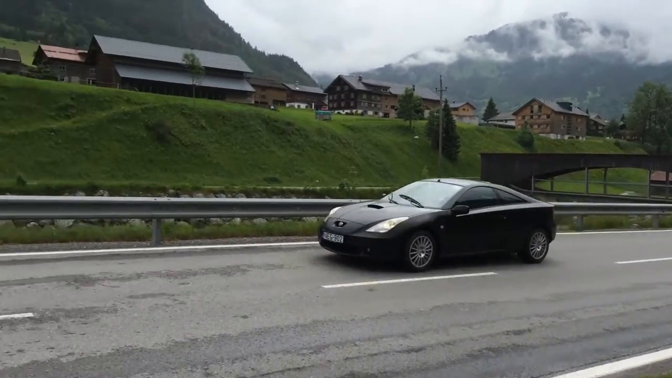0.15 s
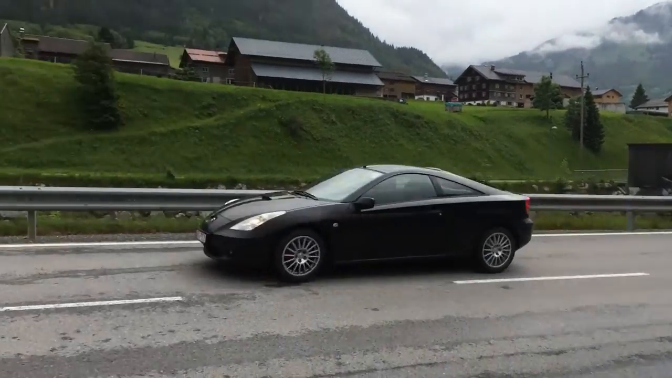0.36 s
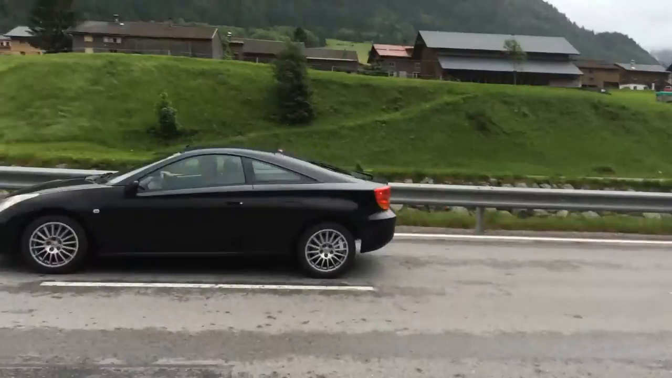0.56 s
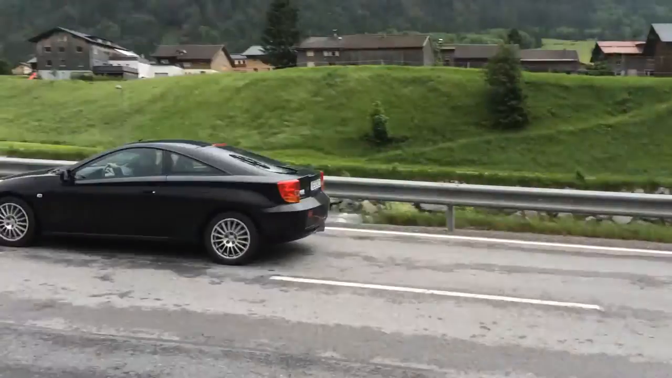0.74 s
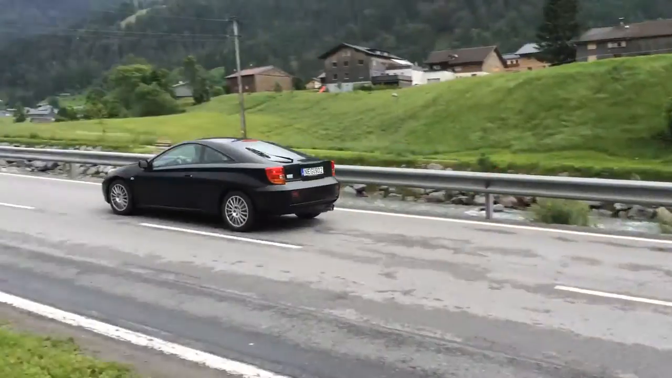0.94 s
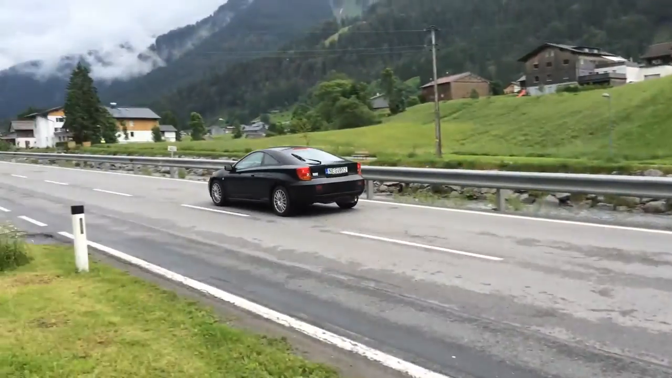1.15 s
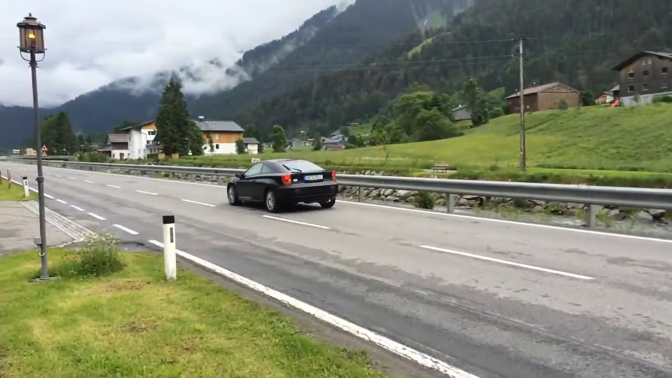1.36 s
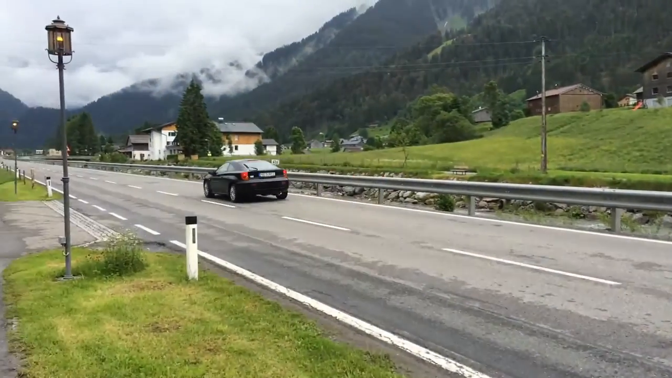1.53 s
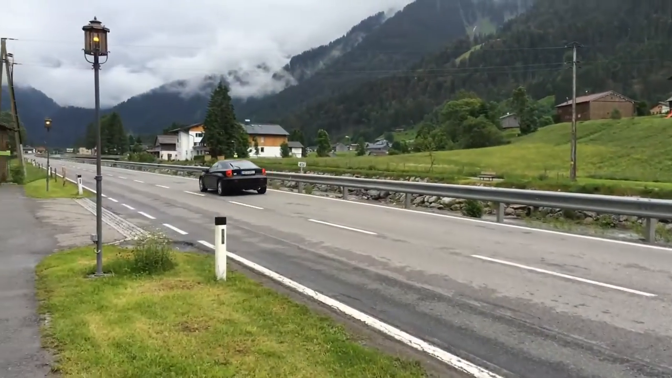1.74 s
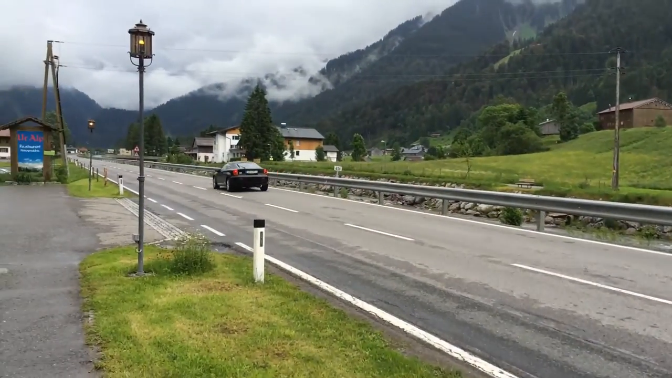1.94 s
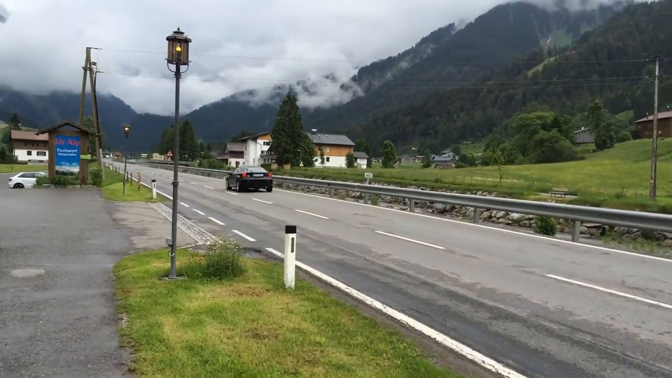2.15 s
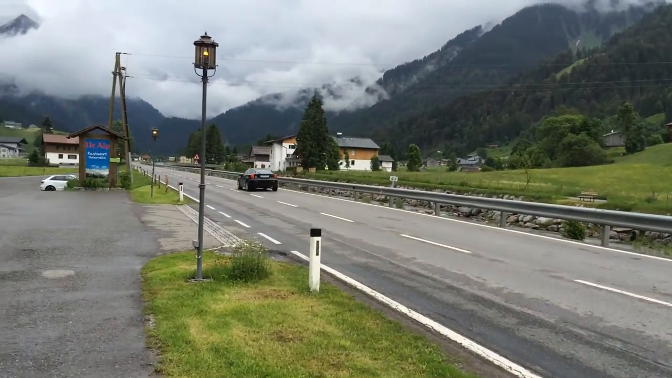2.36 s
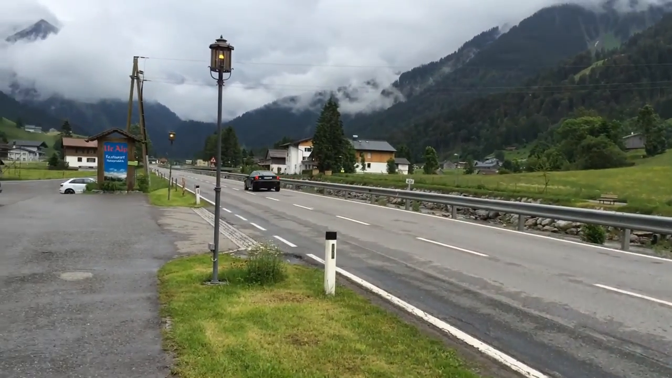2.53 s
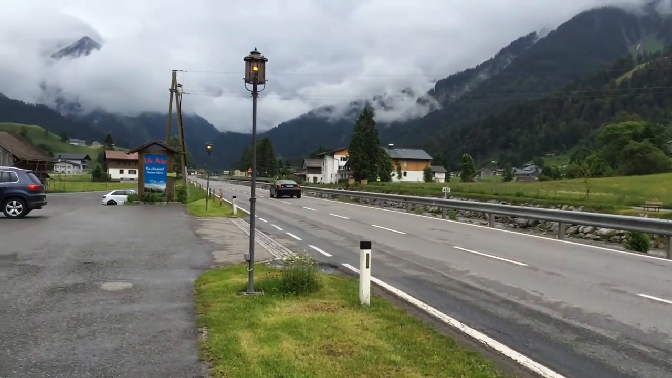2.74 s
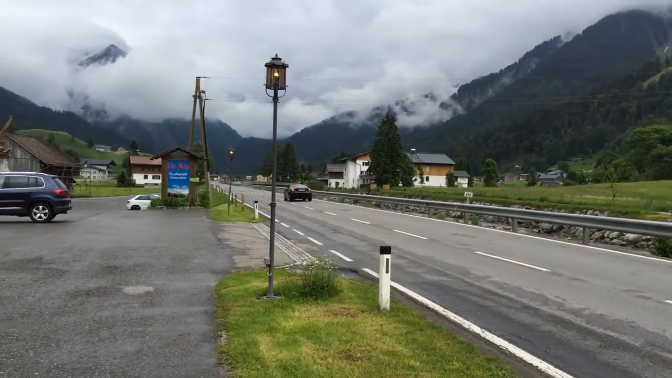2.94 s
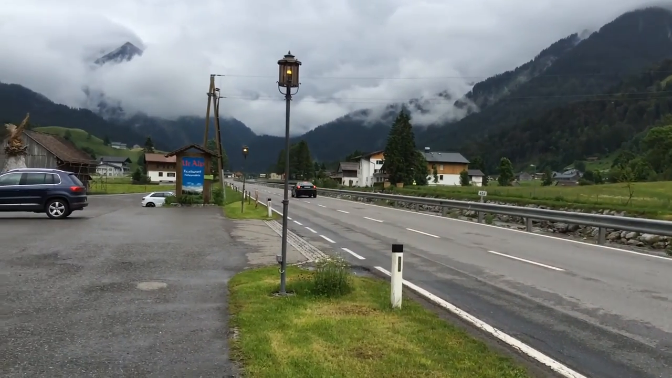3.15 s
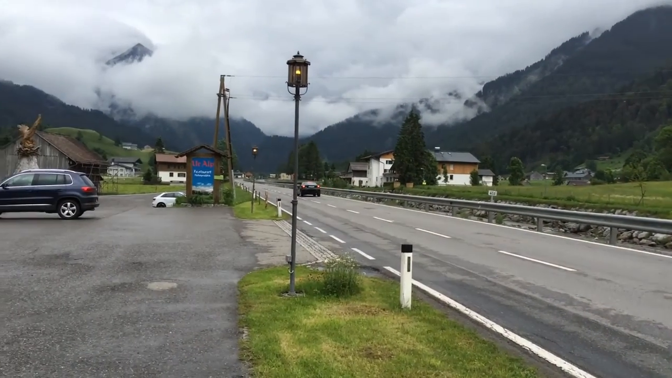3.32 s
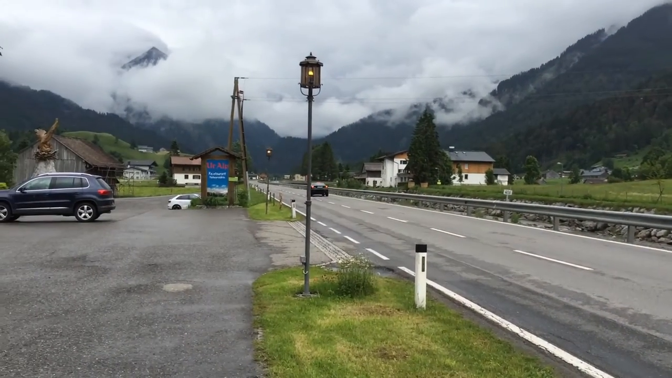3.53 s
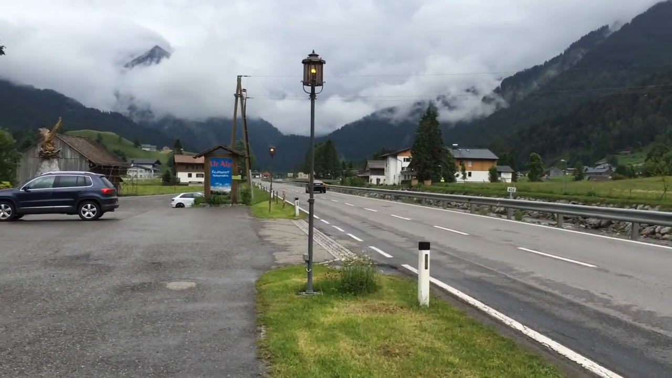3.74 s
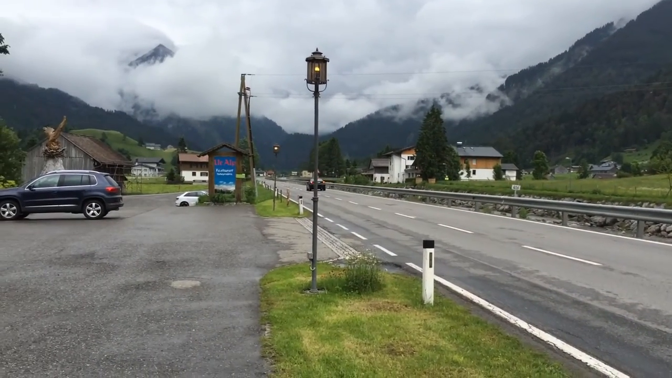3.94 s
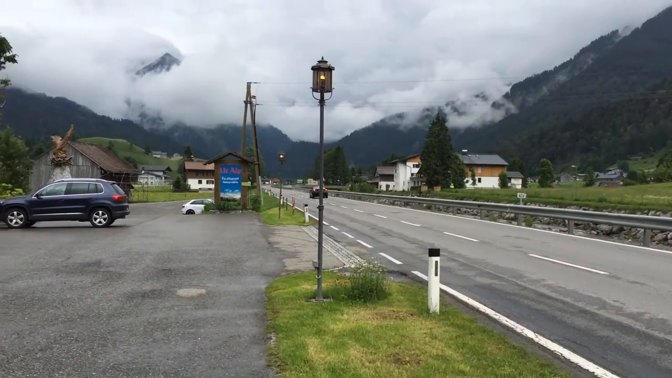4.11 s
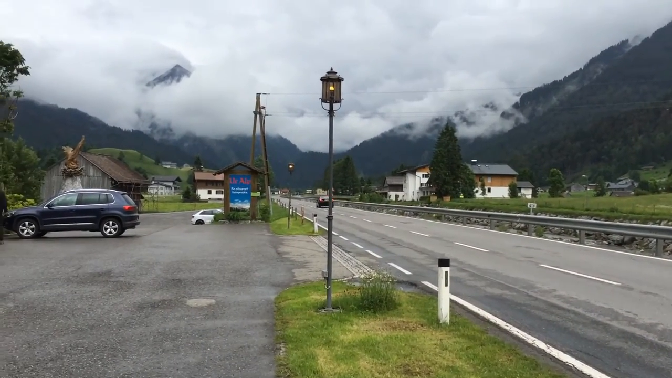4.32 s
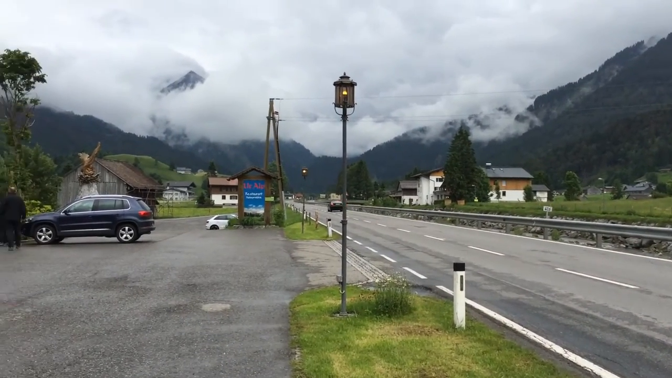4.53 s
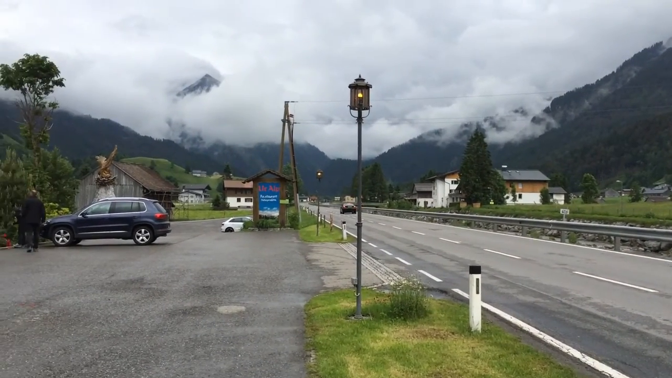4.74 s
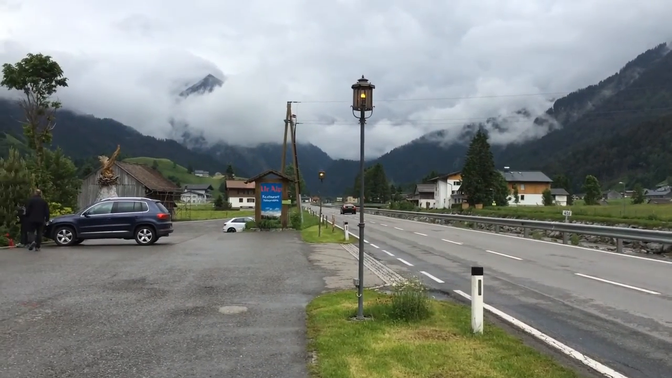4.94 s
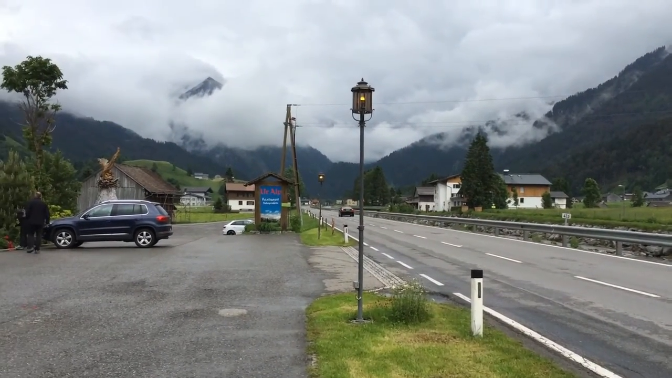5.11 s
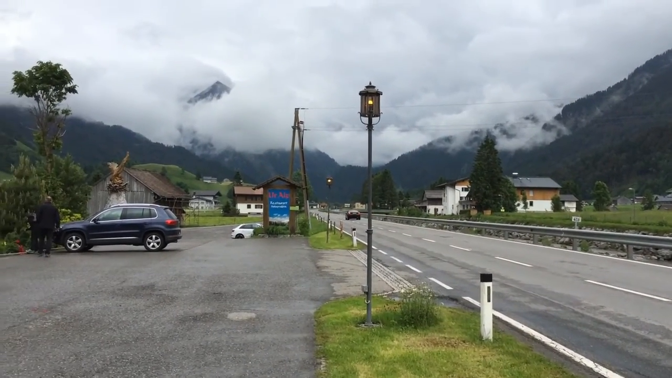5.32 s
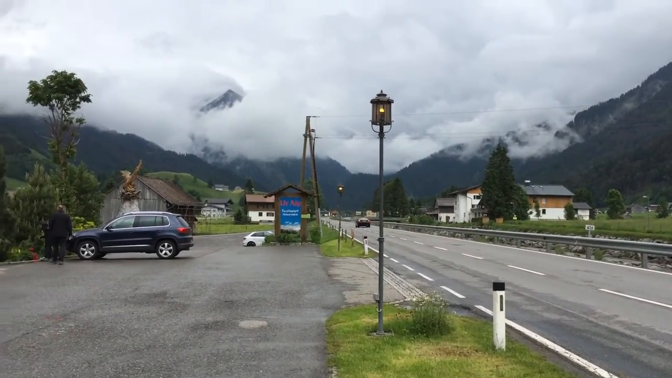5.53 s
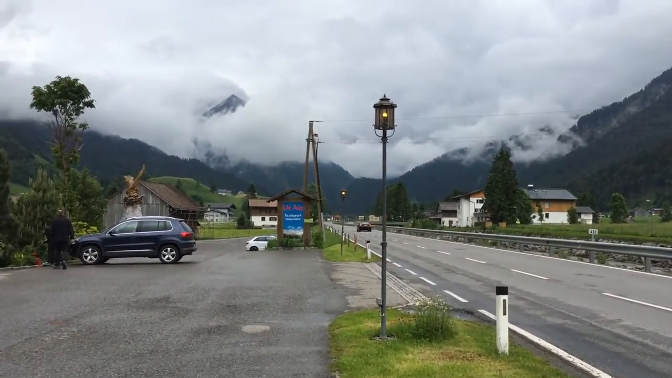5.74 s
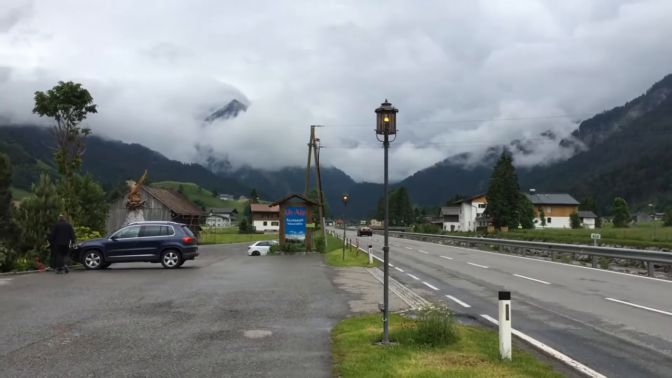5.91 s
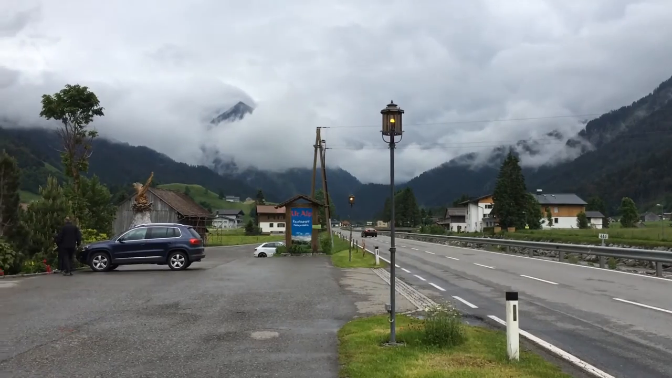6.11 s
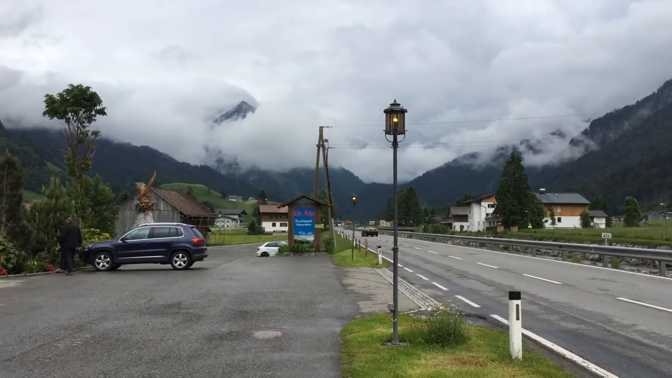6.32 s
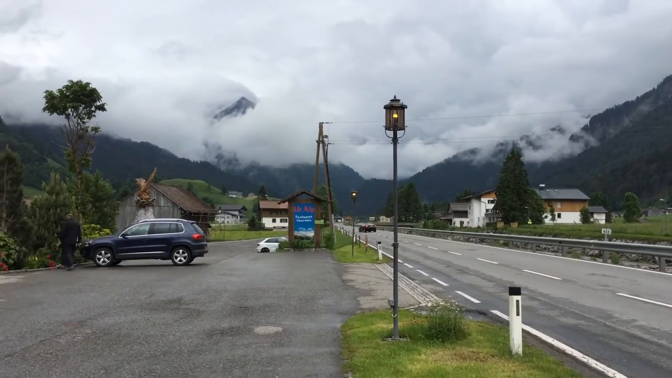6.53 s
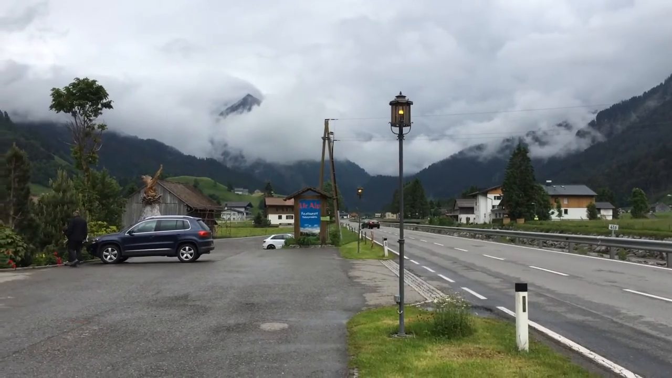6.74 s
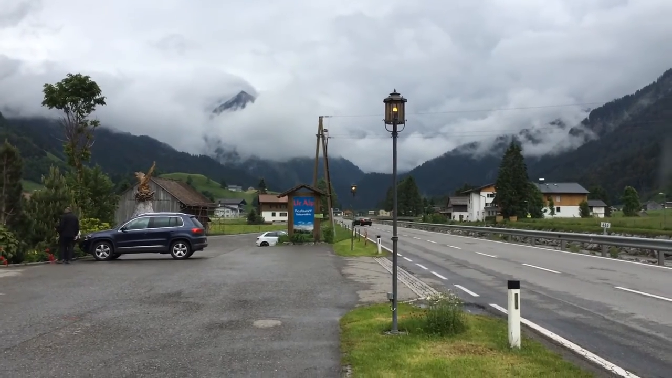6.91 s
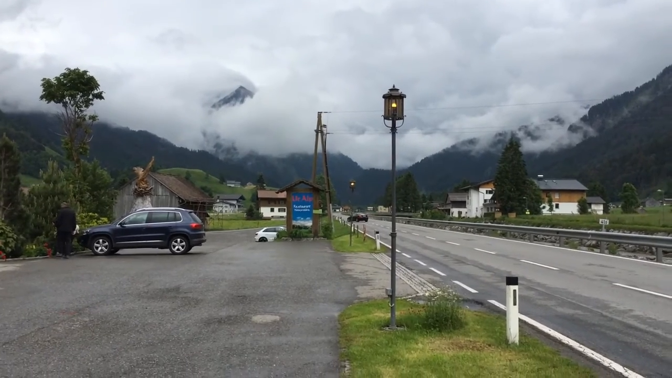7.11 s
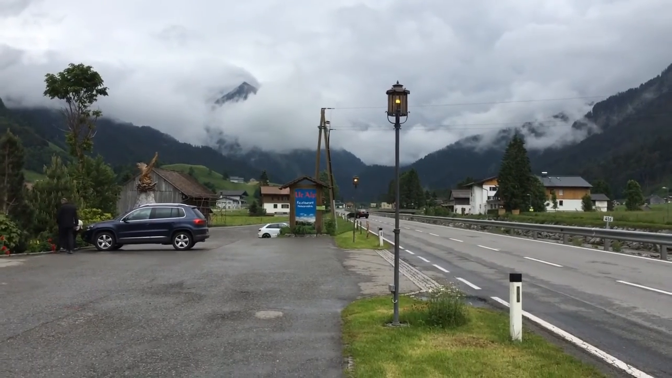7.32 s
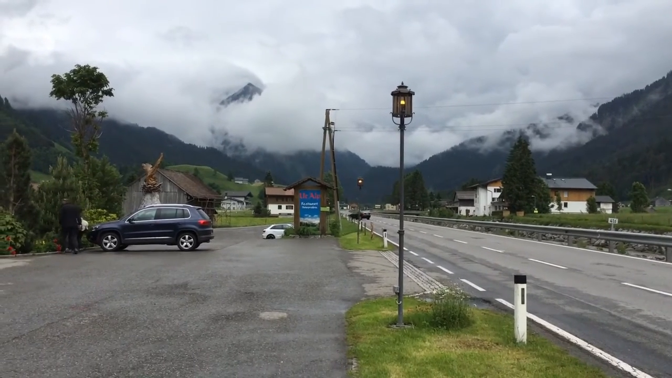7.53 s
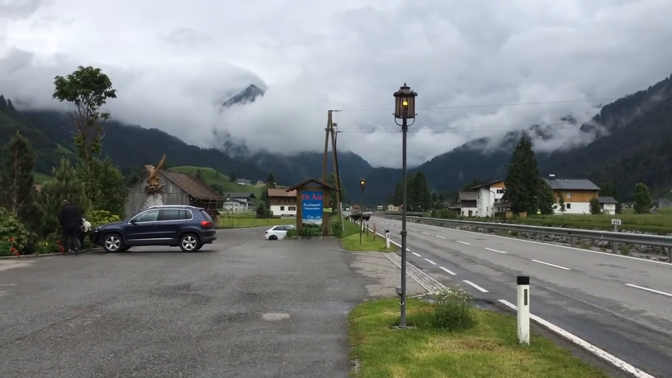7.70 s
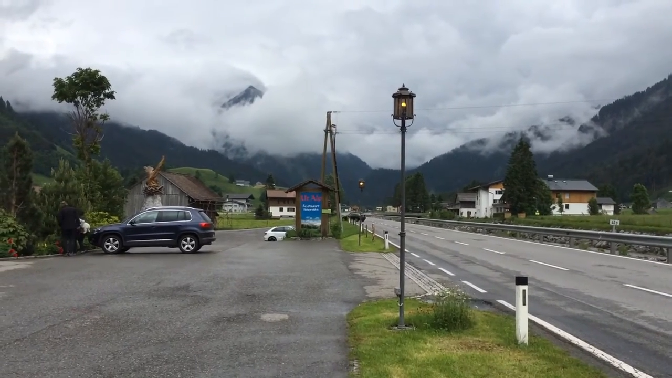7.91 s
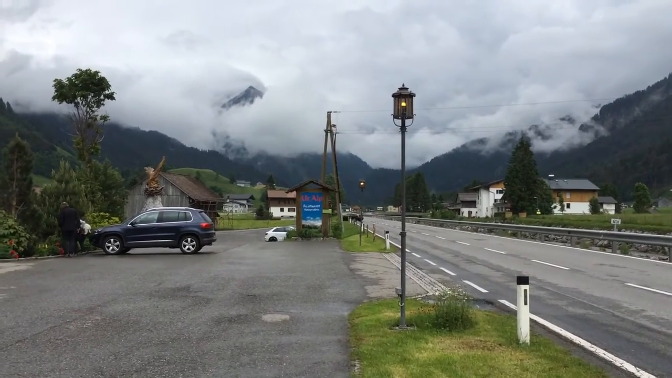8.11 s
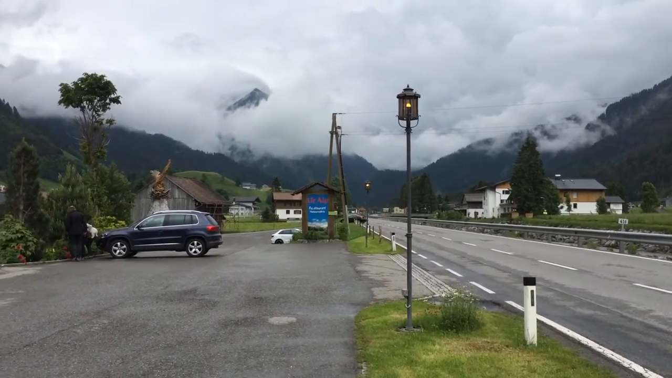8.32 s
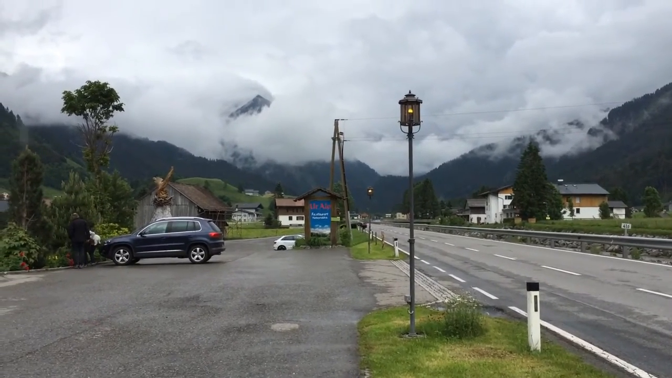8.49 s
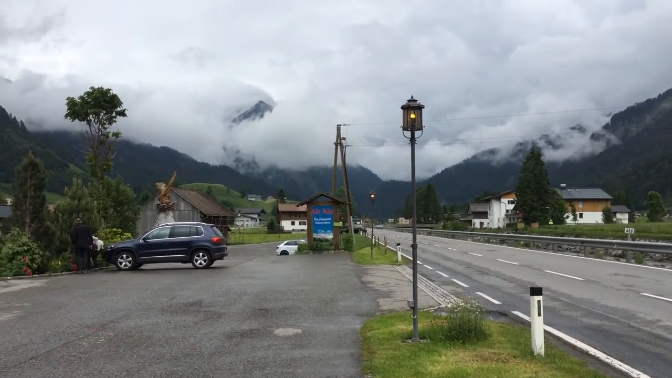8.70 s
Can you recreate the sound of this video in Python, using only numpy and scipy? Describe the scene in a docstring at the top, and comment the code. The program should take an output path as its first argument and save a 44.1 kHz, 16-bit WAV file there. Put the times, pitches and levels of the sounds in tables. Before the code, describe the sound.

A high-revving four-cylinder car passes close with roaring tyres, then lifts off and fades into the distance while a stream washes softly.

```python
"""A small four-cylinder car with a loud exhaust pulls past at high revs; a stream murmurs throughout.
The firing tone and its overtones fade in and out as road and guard-rail echoes meet. The engine bay
whines first, then the tailpipe rasps; gas hisses, tyres roar. At 1.9 s the throttle shuts: the tread
sings, the car shifts and rolls away down a valley road, burbling. A low hum wobbles from 2.7 s,
three dry ticks fall between 3 and 6.2 s, and a faint peep follows at 7.6 s."""
import sys
import numpy as np
from scipy import signal
from scipy.io import wavfile
from scipy.ndimage import uniform_filter1d

SR = 44100
rng = np.random.default_rng(int(sys.argv[2]) if len(sys.argv) > 2 else 0)


def digitize_waveform(pressure):
    """Quantize a signal to 16-bit integers and store it at the path in sys.argv[1].

    Rows of a 2-D input are taken as channels; values are limited to [-1, 1].
    """
    field = np.atleast_2d(pressure).T
    bounded = np.clip(field, -1, 1)
    quanta = np.round(bounded * 32767).astype(np.int16)
    wavfile.write(sys.argv[1], SR, quanta)


N = 386295
TIME_S = np.arange(N) / SR

# Each row: time in seconds, four-stroke cycle rate as heard in Hz, firing tone level in dB.
# Orders are multiples of the cycle rate; order 4 is the firing tone.
ENGINE = [(0, 40.5, -16), (0.3, 41.5, -20), (0.44, 41.9, -10.5), (0.85, 41.4, -19), (1.34, 42.9, -13),
          (1.86, 44.5, -22.5), (1.9, 44.3, -35), (2.06, 43, -35.5), (2.2, 40.5, -24.5), (2.55, 35.5, -24.5),
          (2.7, 29.4, -27), (2.92, 31, -24), (3.0, 29.4, -28), (3.45, 28.2, -28.5), (4.1, 22.5, -37),
          (4.6, 15.2, -43), (5.2, 25.2, -32.5), (5.42, 21.4, -36), (5.6, 22, -40), (5.85, 18.3, -40.5),
          (6.2, 16, -43), (6.5, 13.6, -59), (6.9, 10.7, -70)]

NOSE_AWAY_S, NOSE_TURN_S = 0.524, 0.032  # nose turns away
TAIL_S, TAIL_TURN_S = 0.96, 0.078  # tailpipe comes into view
PASS_S = 1.47  # car is nearest
LIFT_S, LIFT_RAMP_S = 1.925, 0.011  # throttle shuts
STAGGER_S = 0.025  # low orders die this long before the lift, pipe overtones this long after


def gain_of(db):
    """Decibels to amplitude."""
    return 10 ** (np.asarray(db) / 20)


def unit_rms(x):
    """Scale to rms 1."""
    return x / np.sqrt(np.mean(x ** 2) + 1e-20)


def curves(rows):
    """One per-sample curve for each column after the time column."""
    times_s, *columns = np.transpose(rows)
    return [np.interp(TIME_S, times_s, column) for column in columns]


def window(rows, fade_s):
    """1 over a table's time span, with linear fades outside it."""
    fade_in = np.clip((TIME_S - rows[0][0]) / fade_s + 1, 0, 1)
    fade_out = np.clip((rows[-1][0] - TIME_S) / fade_s + 1, 0, 1)
    return fade_in * fade_out


def after(at_s, ramp_s):
    """Smooth step from 0 to 1 around at_s."""
    return .5 + .5 * np.tanh((TIME_S - at_s) / ramp_s)


def wander(hz):
    """Random curve of rms 1 that changes about hz times a second."""
    step = max(int(SR / hz), 1)
    knots = rng.standard_normal(N // 64 + 2)[:N // step + 2]
    line = np.interp(np.arange(N) / step, np.arange(len(knots)), knots)
    return unit_rms(uniform_filter1d(line, step))


def noise(spectrum, patchy_db, tilt_db_per_oct=None, size=1024):
    """Shaped noise of rms 1 with drifting spectral patches; the tilt acts above 1.5 kHz."""
    hop = size // 4
    frames, hz = N // hop + 5, np.fft.rfftfreq(size, 1 / SR)
    real, imag, patches = rng.standard_normal((frames, len(hz), 3)).T
    patches = unit_rms(uniform_filter1d(uniform_filter1d(patches, size=12, axis=0), size=12, axis=1))
    knots_hz, knots_db = np.transpose(spectrum)
    colour_db = np.interp(np.log(hz + 1), np.log(knots_hz), knots_db, left=-80)[:, None]
    if tilt_db_per_oct is not None:
        starts = np.minimum(np.arange(frames) * hop, N - 1)
        octaves = np.log2(np.maximum(hz, 1500) / 1500)[:, None]
        colour_db = colour_db + octaves * tilt_db_per_oct[starts]
    shape = gain_of(colour_db)
    shape /= np.sqrt((shape ** 2).mean(0))
    spectra = (real + 1j * imag) * shape * gain_of(patchy_db * patches)
    return unit_rms(signal.istft(spectra, nperseg=size, noverlap=size - hop)[1][:N])


def band(hz, width_hz):
    """Noise of rms 1 in one resonance centred on hz, steady or gliding."""
    carrier = np.exp(2j * np.pi * np.cumsum(hz * np.ones(N)) / SR)
    pole = np.exp(-np.pi * width_hz / SR)
    white = rng.standard_normal(N) + 1j * rng.standard_normal(N)
    baseband = signal.lfilter([1], [1, -2 * pole, pole ** 2], white)
    return unit_rms((carrier * baseband).real)


def tone(cycles, db, fade_db=0, smear_rad=0, rough_db=0, locked=False):
    """Sine at rms level db; echoes fade it and smear its phase, uneven firing roughens it."""
    offset = 0 if locked else rng.random()
    phase = 2 * np.pi * (cycles + offset) + smear_rad * wander(14)
    return np.sqrt(2) * gain_of(db + fade_db * wander(7) + rough_db * wander(70)) * np.sin(phase)


def swing_db(order):
    """Brief dips and swells of one order, some where echoes meet the direct sound, some from other causes such
    as a puff of gas as the throttle shuts."""
    # Each row: time in seconds, order, change in dB, half width in seconds.
    swings = [(0.583, 4, -7, 0.049), (1.09, 4, -16, 0.071), (0.805, 4, -6, 0.024), (0.7, 4, 1, .05),
              (1.02, 3, 5.5, .2), (4.174, 4, 8, 0.068), (1.035, 5, -7, 0.1), (1.95, 4, -8, .014),
              (2.01, 4, 6, .045), (2.0, 3, 34, .022), (0.44, 6, -8, .05), (5.2, 12, -5, .3),
              (1.85, 32, -10, .15), (2.065, 4, -9, .016), (2.228, 4, -7, .014), (2.8, 4, -7, .018),
              (0.3, 8, 4.5, 0.043), (1.215, 8, 7.5, 0.078), (1.4, 8, -3.5, 0.11), (3.8, 8, 5.5, 0.46),
              (6.2, 8, 12, 0.19), (0.57, 8, -7, .04), (0.77, 8, -14, .015), (0.875, 8, -12, .015),
              (1.075, 8, -14, .025), (1.8, 8, 3, .15), (2.0, 8, -18, .025), (2.08, 8, 5, .05),
              (0.11, 11, -18, 0.12), (0.448, 11, -3, 0.028), (0.049, 13, 8, 0.25), (0.17, 19, -19, 0.045),
              (1.46, 12, -7, 0.051), (2.0, 12, 7.5, 0.059), (2.3, 12, -28, 0.24), (2.4, 12, -7, 0.036),
              (2.23, 16, 11.5, 0.12), (1.14, 16, -10, 0.027), (1.1, 16, -11, 0.033), (1.53, 20, -9, 0.12),
              (0.75, 32, -27, 0.17), (0.75, 36, -12, .17), (1.51, 32, 3, 0.18)]
    t = np.arange(0, N / SR, .002)
    bumps = [db * np.exp(-((t - at_s) / half_s) ** 2) for at_s, k, db, half_s in swings if k == order]
    return np.interp(TIME_S, t, sum(bumps)) if bumps else 0


def firing(cycles, cycle_hz, db):
    """Firing tone; off throttle, uneven burning makes it burble, more at low revs."""
    burble_db = 45 / cycle_hz * wander(45) * after(LIFT_S, LIFT_RAMP_S)
    return tone(4 * cycles, db + swing_db(4) + burble_db, fade_db=.6, smear_rad=.17, locked=True)


def pulling(cycles):
    """Orders under load; locked orders 3 to 6 throb once a cycle, order 5 peaks at 0.82 s."""
    drop_db = -29
    shut_db = drop_db * after(LIFT_S - STAGGER_S, 2 * LIFT_RAMP_S)
    abreast = np.exp(-((TIME_S - 0.82) / 0.4) ** 2)
    fifth_db = -19 - 9.5 * (1 - abreast) + swing_db(5) + shut_db
    eighth_db = -22.5 - 7 * TIME_S + swing_db(8) + drop_db * after(LIFT_S, LIFT_RAMP_S)
    return (tone(5 * cycles, fifth_db, fade_db=1.2, smear_rad=.15, locked=True)
            + tone(8 * cycles, eighth_db, fade_db=1, smear_rad=.3, rough_db=2)
            + tone(3 * cycles, -38 + swing_db(3) + shut_db, fade_db=.8, smear_rad=.15, locked=True)
            + tone(7 * cycles, fifth_db - 20, fade_db=2, smear_rad=.5))  # the cylinders differ


def whine(cycles):
    """Orders that the engine bay radiates forwards; they fade as the nose passes."""
    # Each row: facing level in dB, change once turned away in dB. Rows are orders 6, 11, 19.
    nose_levels = [(-30.5, -3.5), (-27.5, -12), (-27.5, -12.5)]
    away = [after(at_s, NOSE_TURN_S) for at_s in (NOSE_AWAY_S, NOSE_AWAY_S, 0.3)]
    sixth_db, eleventh_db, nineteenth_db = (
        db + change_db * step for (db, change_db), step in zip(nose_levels, away))
    orders = (tone(6 * cycles, sixth_db + swing_db(6), fade_db=1.5, smear_rad=.2, locked=True)
              + tone(13 * cycles, sixth_db - 9 + swing_db(13), fade_db=2, smear_rad=.3, rough_db=3)
              + tone(11 * cycles, eleventh_db + swing_db(11), smear_rad=.3, rough_db=2.5)
              + tone(19 * cycles, nineteenth_db + swing_db(19), smear_rad=.3, rough_db=2.5))
    return orders * (1 - after(0.99, 0.087))


def exhaust_rumble(load, lull_db):
    """Low exhaust noise, screened at first by the car body."""
    # Each row: frequency in Hz, relative density in dB.
    spectrum = [(30, -14), (60, -7), (170, 9.5), (300, 0.5), (600, 2.5), (1200, -10), (5000, -70)]
    hidden = 1 - after(0.073, 0.11)
    db = -32 - 2.5 * TIME_S + 2 * load + 2 * lull_db - 3 * hidden
    return gain_of(db) * noise(spectrum, patchy_db=1.4, size=2048)


def tyre_roar(load, lull_db, surge):
    """Tyre noise swells to the pass; distance, ground loss and air then weaken and dull it."""
    # Each row: frequency in Hz, relative density before the tilt in dB.
    spectrum = [(200, -64), (500, -8.5), (900, 2.5), (1370, 3), (1900, -2), (2250, -2), (2700, -9.5),
                (3400, -13), (4200, -17.5), (5000, -28.5), (9000, -47), (16000, -78)]
    near_s = 1.024  # nearest distance over speed
    spread_db = -10 * np.log10(1 + ((TIME_S - PASS_S) / near_s) ** 2)
    ground_db = -2 * np.maximum(TIME_S - PASS_S, 0)
    db = -26.5 + spread_db + ground_db + load + lull_db  # full load adds 1 dB
    tilt = 5.5 - 3 * after(TAIL_S, TAIL_TURN_S) * load - 0.99 * np.minimum(TIME_S, 4.5)
    return gain_of(db) * noise(spectrum, patchy_db=1.28, tilt_db_per_oct=tilt) * surge ** 0.45


def gas_hiss(surge):
    """Gas surges and spits from the pipe; fast flow under load hisses brighter."""
    # Each row: frequency in Hz, relative density before the tilt in dB.
    spectrum = [(1500, -3.5), (3500, 7.5), (6000, 3), (8000, -4), (12000, -8.5), (16000, -12.5)]
    # Each row: time in seconds, level before normalising gain and fades in dB.
    levels = [(0, -41.5), (0.74, -36), (0.82, -32.5), (1.15, -33), (1.52, -36), (1.62, -40), (1.72, -36.5),
              (1.9, -34), (1.96, -44.5), (2.3, -46), (3.0, -53), (3.6, -55.5)]
    db, = curves(levels)
    hiss = noise(spectrum, patchy_db=2, tilt_db_per_oct=0.32 * (db + 40.5), size=512)
    spit = gain_of(0.76 * wander(600))
    return gain_of(db) * unit_rms(hiss * surge * spit) * window(levels, fade_s=1.4)


def stream():
    """Flickering wash of water with a gurgling band of small bubbles."""
    # Each row: frequency in Hz, relative density in dB.
    spectrum = [(25, -27), (69, -5.5), (113, -6), (178, -3), (252, -6), (535, -15.5), (1080, -16.5),
                (1600, -20), (2500, -29.5), (3350, -28), (4200, -32), (7000, -38), (15400, -52)]
    wash = gain_of(-41 + .3 * wander(200)) * noise(spectrum, patchy_db=.7, size=2048)
    bubbles_db = -67.5 + 1.5 * wander(5.4) + 3.7 * wander(40)
    return wash + gain_of(bubbles_db) * band(3240 + 150 * wander(25), width_hz=400)


def bay_rasp():
    """Valve gear and intake rasp through the grille, then the wheels rasp."""
    # Each row: peak time in seconds, half width in seconds, centre in Hz, width in Hz, level in dB.
    rasps = [(0.47, 0.2, 2246, 263, -39), (0.47, 0.15, 3170, 1100, -34.5), (0.97, 0.18, 3196, 1600, -33)]
    out = np.zeros(N)
    for peak_s, half_s, hz, width_hz, db in rasps:
        swell = np.exp(-((TIME_S - peak_s) / half_s) ** 2 / 2)
        out += swell * gain_of(db + 1.8 * wander(17.1)) * band(hz, width_hz)
    return out


def tailpipe(cycle_hz):
    """Firing overtones; the pipe end passes later than the nose, so its pitch drops later."""
    # Each row: order, level in dB relative to rasp_db.
    overtones = [(16, -5), (20, -2), (24, -13), (28, -11), (32, -4), (36, -15)]
    lead_hz, rasp_s = .9, 0.76
    hidden = 1 - after(TAIL_S, TAIL_TURN_S)
    cycles = np.cumsum(cycle_hz + lead_hz * hidden) / SR
    recede_db = -4 * np.maximum(TIME_S - PASS_S, 0)
    burn_db = wander(43.9)  # each cycle burns a little differently
    twelfth_db = -32 - 12 * hidden + swing_db(12) + recede_db + burn_db
    rasp_db = -30.5 - 9 * (1 - after(rasp_s, TAIL_TURN_S)) + recede_db + burn_db
    twelfth = tone(12 * cycles, twelfth_db, fade_db=1.5, smear_rad=.4, rough_db=2.5)
    rasp = sum(tone(k * cycles, rasp_db + db + swing_db(k), fade_db=.8, smear_rad=.9, rough_db=2)
               for k, db in overtones)
    load = 1 - after(LIFT_S + STAGGER_S, 2 * LIFT_RAMP_S)
    return (twelfth + rasp) * after(NOSE_AWAY_S, NOSE_TURN_S) * load


def tread_song():
    """The tread sings in one band that climbs as the ground echo shortens."""
    # Each row: time in seconds, centre in Hz, level in dB.
    track = [(1.9, 1220, -62), (2.3, 1349, -33.5), (2.6, 1240, -53), (2.98, 1293, -34.5), (3.3, 1369, -37),
             (3.5, 1486, -35.5), (3.95, 1540, -39.5), (4.6, 1602, -55.5)]
    hz, db = curves(track)
    return gain_of(db + 1.2 * wander(8)) * band(hz, width_hz=560) * window(track, fade_s=0.9)


def coasting(cycles, cycle_hz):
    """The few firing overtones left with the throttle shut."""
    # Each row: order, level in dB relative to top_db.
    overtones = [(16, -10.5), (20, -4), (24, -6.5)]
    since_s = TIME_S - LIFT_S
    eighth_db, twelfth_db = -45 - 2 * since_s, -40 - 3 * since_s
    top_db = twelfth_db - 3 + np.minimum(cycle_hz - 26, 0)  # top orders die at low revs
    out = tone(8 * cycles, eighth_db + swing_db(8), fade_db=2.5, smear_rad=1.1, rough_db=2)
    out += tone(12 * cycles, twelfth_db + swing_db(12), fade_db=2, smear_rad=1.3, rough_db=2)
    for k, db in overtones:
        out += tone(k * cycles, top_db + db + swing_db(k), fade_db=1, smear_rad=1, rough_db=.5)
    return out * after(LIFT_S, LIFT_RAMP_S) * window(ENGINE, fade_s=0.092)


def hum():
    """A faint low tone wobbles down and rises again."""
    # Each row: time in seconds, pitch in Hz, level in dB.
    glide = [(2.66, 104.3, -39), (2.75, 64.5, -39), (2.85, 99, -38), (2.95, 89.06, -35), (3.02, 66.6, -40),
             (3.1, 83.5, -39), (3.27, 47, -46), (3.35, 60.5, -41), (3.55, 28.3, -47), (3.75, 30.04, -50),
             (4.05, 75.1, -40)]
    hz, db = curves(glide)
    return tone(np.cumsum(hz) / SR, db, fade_db=.5, smear_rad=.41) * window(glide, fade_s=.05)


def ticks():
    """Small dry ticks close by: noise bursts without bass."""
    # Each row: start in seconds, level in dB from which the decay starts.
    hits = [(3.076, -35), (3.276, -36), (6.187, -44)]
    attack_s, t60_s = 0.004, 0.048
    out, t = np.zeros(N), np.arange(1600) / SR
    bandpass = signal.butter(1, (2200, 4500), "bandpass", fs=SR)
    for start_s, db in hits:
        burst = unit_rms(signal.lfilter(*bandpass, rng.standard_normal(len(t))))
        envelope = np.minimum(t / attack_s, 1) * gain_of(db - 60 * t / t60_s)
        out[round(start_s * SR):][:len(t)] += burst * envelope
    return out


def peep():
    """One short rising peep, perhaps a distant bird."""
    start_s, length_s, hz, db, rise_hz_per_s = (7.64, .028, 4350, -57, 8000)
    out, t = np.zeros(N), np.arange(0, length_s, 1 / SR)
    sweep = np.sin(2 * np.pi * (hz + rise_hz_per_s * t / 2) * t)
    out[round(start_s * SR):][:len(t)] += gain_of(db) * sweep * np.hanning(len(t))
    return out


def scene():
    """Car, stream, hum, ticks and peep in one channel."""
    cycle_hz, firing_db = curves(ENGINE)
    cycles = np.cumsum(cycle_hz) / SR
    engine = (firing(cycles, cycle_hz, firing_db) + pulling(cycles) + whine(cycles)
              + tailpipe(cycle_hz) + coasting(cycles, cycle_hz))
    load = 1 - after(LIFT_S, LIFT_RAMP_S)
    lull_db = -6 * (1 - load) * np.exp(-((TIME_S - LIFT_S) / 0.16) ** 2 / 2)  # brief dip after the lift
    surge = gain_of(wander(9))  # gas flow wavers
    rush = exhaust_rumble(load, lull_db) + tyre_roar(load, lull_db, surge) + gas_hiss(surge)
    return (engine + rush + bay_rasp() + tread_song() + hum() + stream() + ticks() + peep())[None]


def record(dry):
    """Short fade-in, then a steep low-pass."""
    fade_s, cutoff_hz = .012, 15480
    lowpass = signal.firwin(2047, cutoff_hz, window=("kaiser", 13), fs=SR)
    return signal.oaconvolve(dry * np.minimum(TIME_S / fade_s, 1), lowpass[None], "same")


dry = scene()
out = record(dry)
digitize_waveform(out)
```